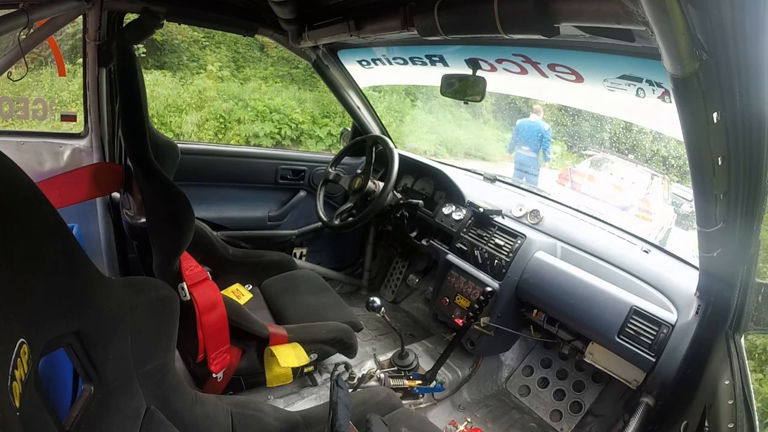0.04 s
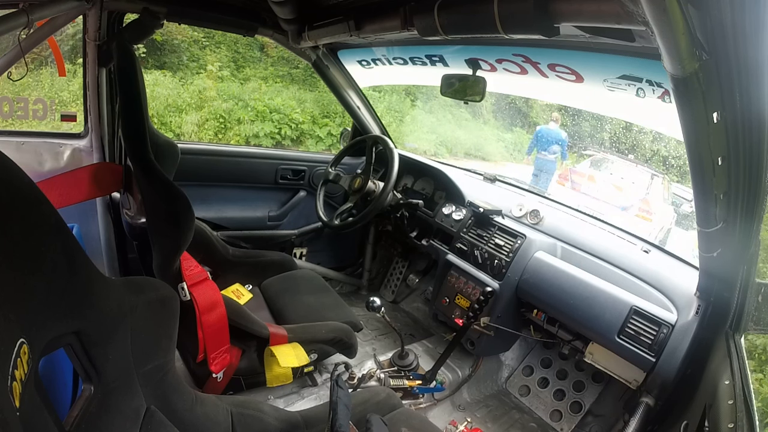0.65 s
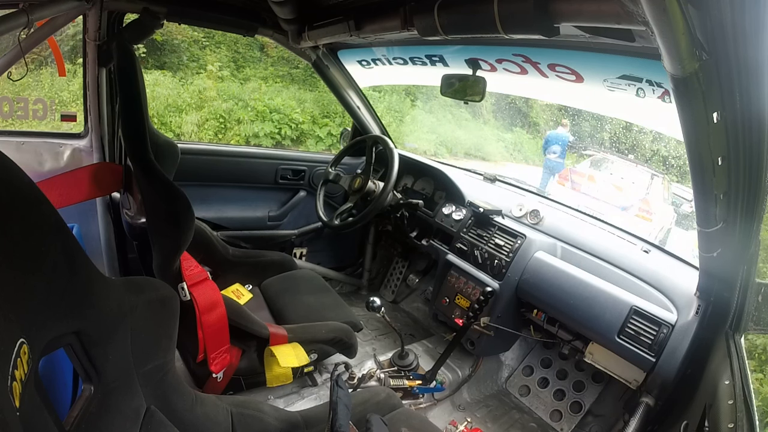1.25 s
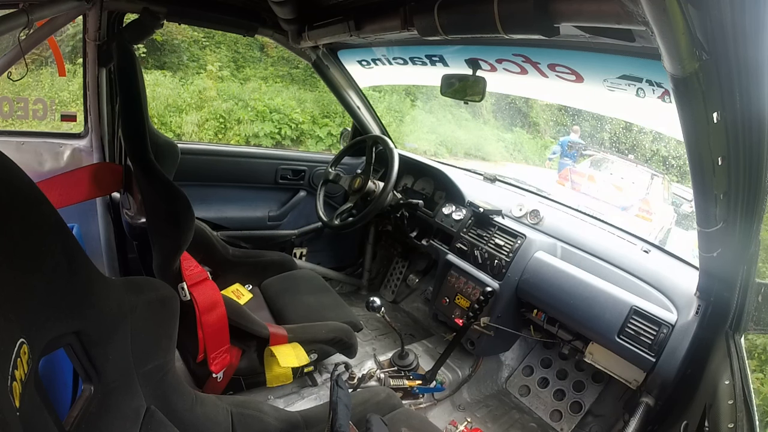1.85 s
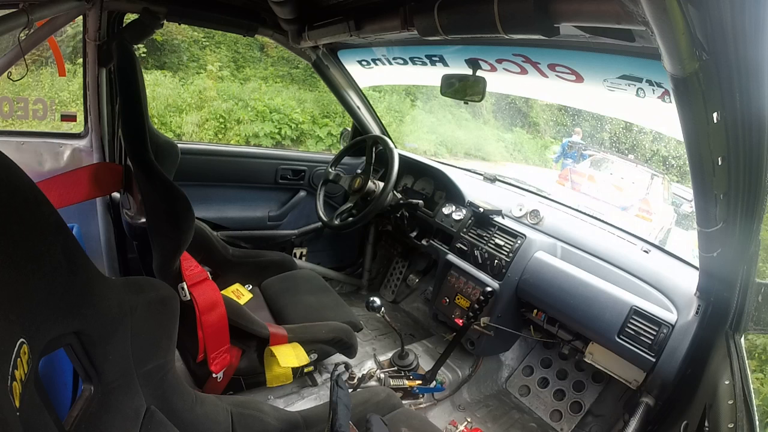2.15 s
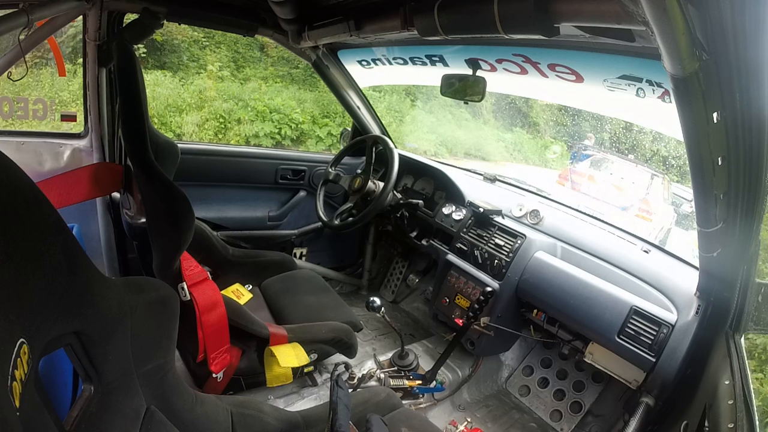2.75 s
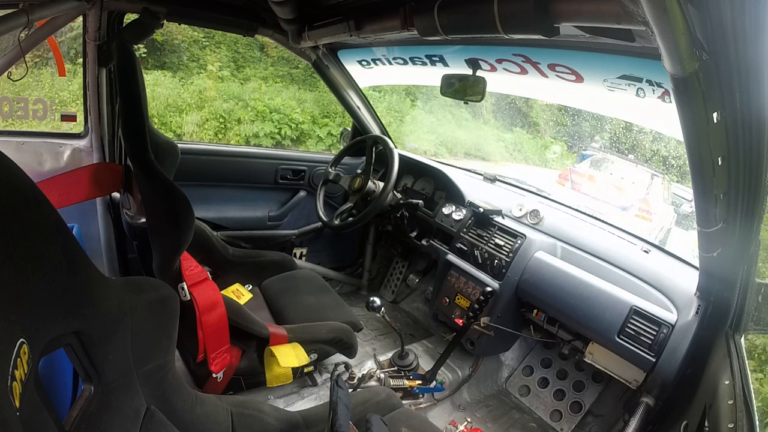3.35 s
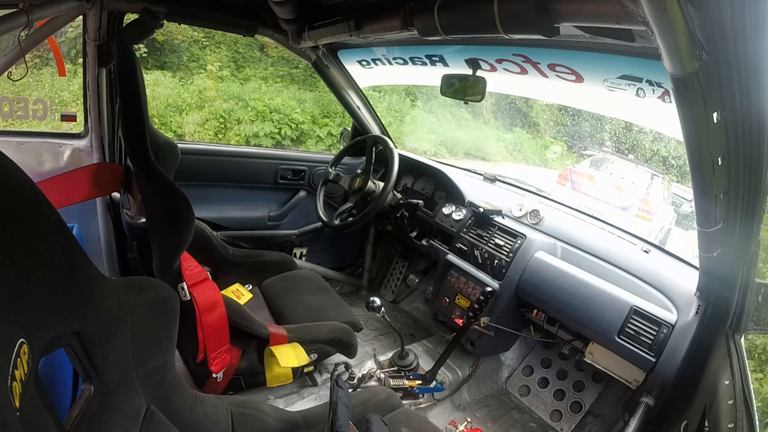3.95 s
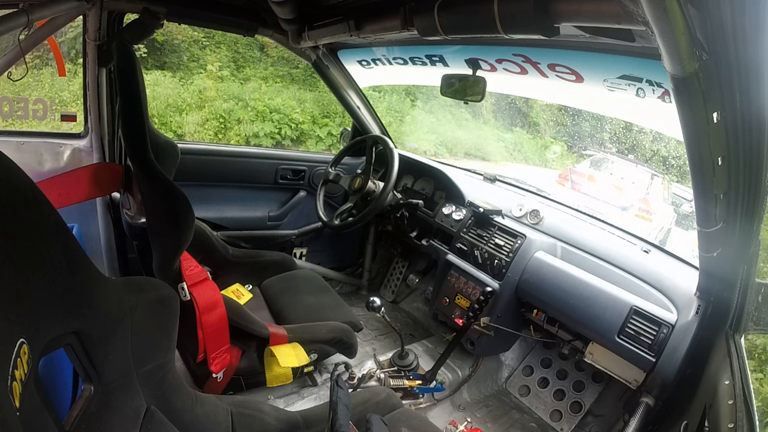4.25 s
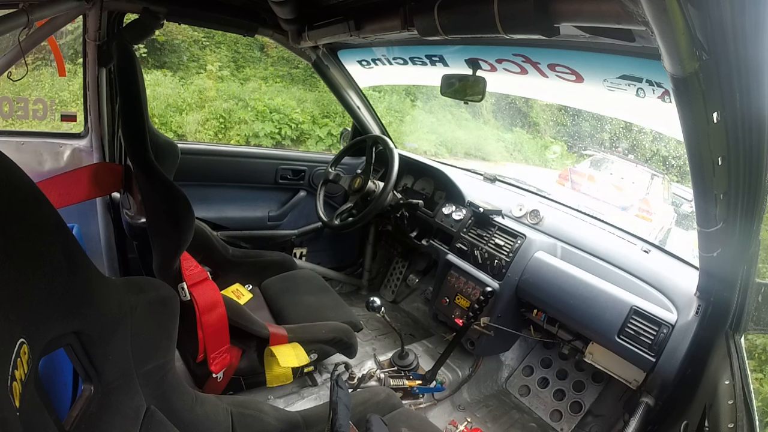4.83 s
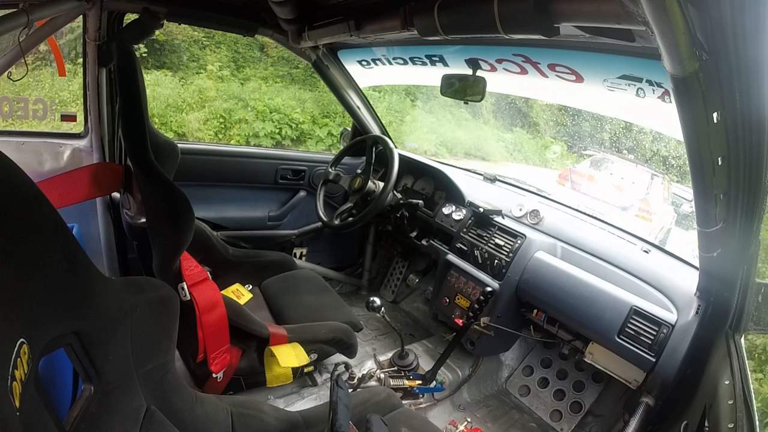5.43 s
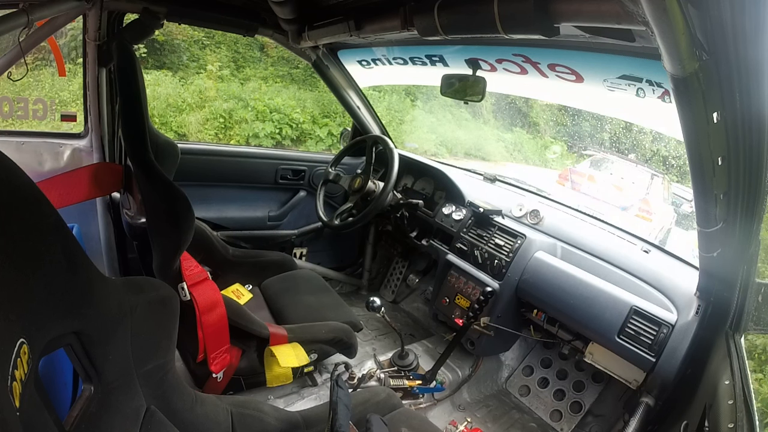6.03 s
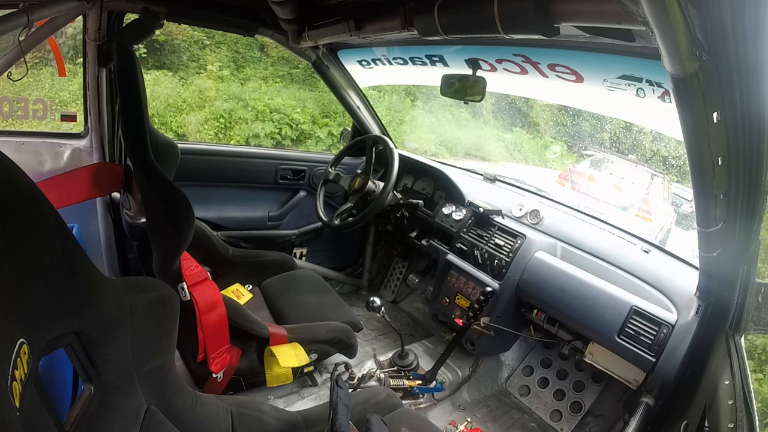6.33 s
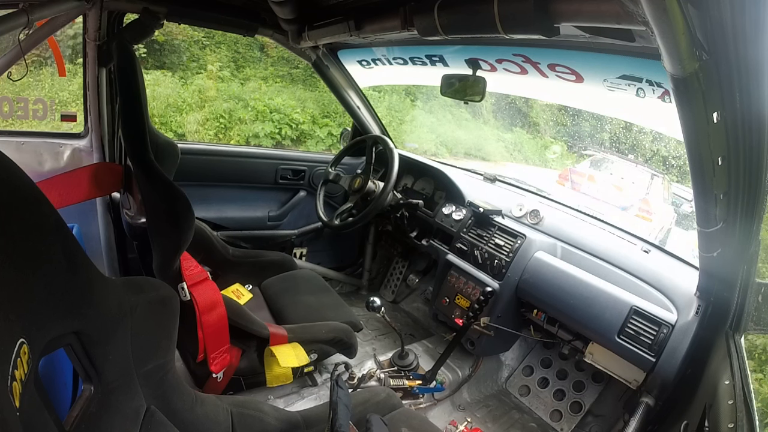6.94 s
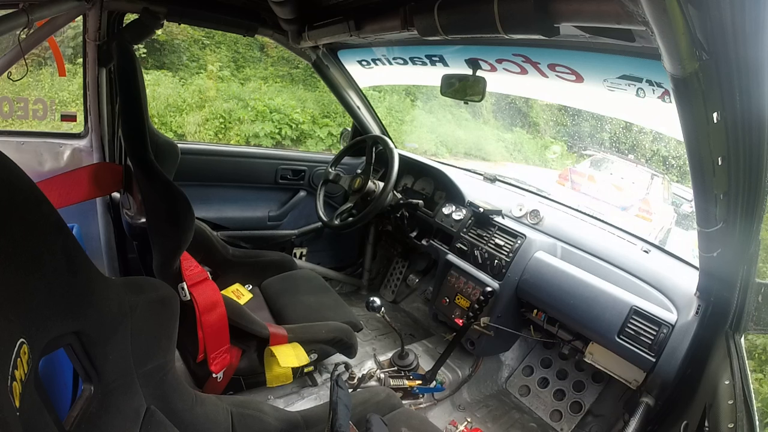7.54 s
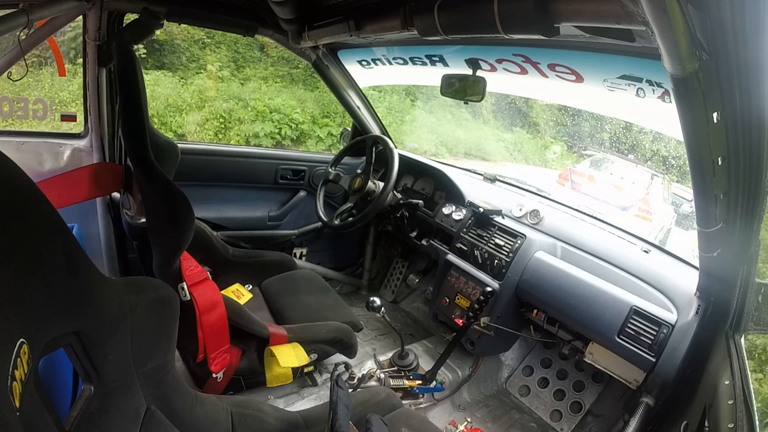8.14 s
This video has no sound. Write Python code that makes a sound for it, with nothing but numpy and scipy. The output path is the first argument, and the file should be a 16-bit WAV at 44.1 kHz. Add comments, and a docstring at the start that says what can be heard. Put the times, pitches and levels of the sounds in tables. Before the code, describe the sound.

A deep, lumpy engine idle rises and falls throughout, heard from between the seats of a stationary rally car with a bare, booming cabin. Ragged at first, it soon settles into regular surges. The low drone of another car ahead gradually climbs in pitch and grows stronger in the second half. Soft engine hiss, a thin pump whine and scattered small ticks stay far in the background.

```python
"""Idling inside a rally car

In a stripped, parked car a four-cylinder engine hunts up and down at a lumpy idle, and its firing
harmonics drive the resonances of the bare cabin into a boom. A second car waiting ahead slowly raises
its revs. Beneath them are engine hiss, a faint pump whine, ticks of loose fittings and an insect."""
import sys
import numpy as np
from scipy import signal
from scipy.fft import rfft, irfft, next_fast_len
from scipy.io import wavfile
from scipy.ndimage import map_coordinates

SR = 44100
rng = np.random.default_rng(int(sys.argv[2]) if len(sys.argv) > 2 else 0)


def unload_audio(sound):
    """Save the sound as a 16-bit wav file, at the path given as the first command line argument."""
    columns = np.transpose(np.atleast_2d(sound))
    # keep every value between -1 and 1, then stretch to whole-number steps
    steps = np.round(np.clip(columns, -1, 1) * 32767)
    wavfile.write(sys.argv[1], SR, steps.astype(np.int16))


N = 360909


# exhaust harmonics: multiple of the firing rate, relative level/dB, share of the surge, flutter/dB
EXHAUST_HARMONICS = [(1, -0.5, -0.7, 2), (2, -1, 1, 1.5), (3, 1, 1.12, 1), (4, -4, 0.35, 4),
                     (5, -5, 1.3, 2.5), (6, -8, 1.2, 2.5), (7, -12, .4, 3.5), (8, -13, .6, 3)]
# the firing, ragged at first, steadies: t/s, even note gain/dB, uneven burns gain/dB
FIRING_BALANCE = [(0, -5, -6), (.6, -5, -6), (.95, -.5, -5.5), (1.6, -1, -9), (8.18, -1, -9.5)]

def idle(firings, gain_db=-24.5, split_hz=190, boom_share=0.73, rasp_db=-1.5):
    """Forced resonance: exhaust harmonics and uneven burns drive the cabin; surges make them bark."""
    *_, swells_db, barks_db, holds_s = np.transpose(SURGES)
    swell_db = surge_gain(swells_db, np.zeros_like(holds_s), lead_s=.13, attack_s=.22, release_s=.16)
    bark_db = surge_gain(barks_db, holds_s, lead_s=.045, attack_s=.12, release_s=.09)
    exhaust = np.zeros(N)
    for k, db, share, flutter_db in EXHAUST_HARMONICS:
        surge_db = share * (bark_db if k > 3 else swell_db)
        exhaust += amp(db + surge_db + flutter_db * wobble(32)) * np.sin(2 * np.pi * k * firings)
    pulses = uneven_burns(firings)
    low = lambda hz: 1 / (1 + (hz / split_hz) ** 16)
    upper_band = lambda hz: np.sqrt(1 - low(hz)) / (1 + (hz / (2 * split_hz)) ** 4)
    boom = filtered(pulses, lambda hz: cabin_gain(hz) * np.sqrt(low(hz)))
    rasp = filtered(pulses, lambda hz: cabin_gain(hz) * upper_band(hz))
    uneven = (amp(boom_share * swell_db) * boom + amp(rasp_db + bark_db) * rasp) / boom.std()
    note_db, uneven_db = curves(FIRING_BALANCE)
    return amp(gain_db) * (amp(note_db) * filtered(exhaust, cabin_gain) + amp(uneven_db) * uneven)


def uneven_burns(firings, limp=0.31):
    """Cyclic variation: each firing is an impulse sized by its departure from the average burn."""
    at = np.flatnonzero(np.diff(np.floor(firings)) > 0)
    alternation = limp * (-1) ** np.arange(len(at))  # every other burn is a little weak
    return np.bincount(at, rng.uniform(-2.16, 2.06, len(at)) + alternation, N)


# the engine sags, catches and surges: catch t/s, speed there/rpm, climb/s, top speed/rpm,
# boom swell/dB, bark/dB, bark hold past the top/s
SURGES = [(-.188, 1245, 0.3645, 1361, 4.5, 7, 0.11), (.494, 1136, .15, 1313, 2.5, 4.5, .05),
          (.928, 1125, 0.4722, 1401, 4, 6, 0.087), (1.859, 1078, 0.331, 1505, 6.5, 6, .12),
          (2.811, 1051, .261, 1513, 5, 8, .1), (3.649, 1096, 0.251, 1433, 7.5, 6, .08),
          (4.418, 1053, .25, 1471, 4, 8, 0.051), (5.1, 1052, .34, 1397, 2, 5.5, -.05),
          (5.705, 1019, 0.283, 1372, 3.5, 6, .14), (6.555, 1072, 0.2197, 1501, 3.5, 9.5, .06),
          (7.255, 1070, .4, 1442, 3.5, 8, 0.0069), (8.103, 1083, .29, 1401, 4.5, 6, .05)]

def hunting(ease=0.61):
    """Hunting oscillation: the speed in rpm climbs from each catch to its top, then sinks to the next."""
    turns = []
    for s, low_rpm, climb_s, top_rpm, *_ in SURGES:
        turns += [(s, low_rpm), (s + climb_s, top_rpm)]
    s, rpm = np.transpose(turns)
    step = np.interp(np.arange(N) / SR, s, np.arange(len(s)))
    eased = np.floor(step) + (1 - np.cos(np.pi * (step % 1))) / 2
    return np.interp(ease * eased + (1 - ease) * step, np.arange(len(s)), rpm)


def surge_gain(peaks_db, holds_s, lead_s, attack_s, release_s):
    """Amplitude envelope in dB: it rises from just before each catch and falls near the top speed."""
    t = np.arange(N) / SR
    gain_db = np.zeros(N)
    for (s, _, climb_s, *_), db, hold_s in zip(SURGES, peaks_db, holds_s):
        rise = (t - s + lead_s) / attack_s
        fall = 1 - (t - s - climb_s - hold_s) / release_s
        gain_db = np.maximum(gain_db, db * np.clip(np.minimum(rise, fall), 0, 1))
    return gain_db


# response of the bare cabin: f/Hz, gain/dB
CABIN_RESPONSE = [(22, -37.5), (35, -32), (45, -17), (56, -23.5), (67, -15.5), (74, -9), (81, -3),
                  (93, -6.5), (104, -4.5), (113, 1), (122, -5.5), (137, -13), (149, -25), (164, -17),
                  (184, -24), (198, -28.5), (224, -16), (244, -22), (262, -50), (303, -42.5), (323, -28.5),
                  (345, -45.5), (600, -59.5)]

def cabin_gain(hz):
    """Transfer function: air and panel modes favour some low frequencies over others."""
    f, db = np.transpose(CABIN_RESPONSE)
    return amp(np.interp(hz, f, db))


# fundamental of the car ahead: t/s, speed/rpm, level/dB
AHEAD_DRONE = [(0, 2475, -36), (.23, 2408, -33), (.64, 2384, -34), (.92, 2442, -30), (1.24, 2491, -26.5),
               (1.83, 2537, -28.5), (2.28, 2669, -27.5), (2.66, 2746, -31), (2.97, 2787, -36),
               (3.21, 2840, -24), (3.69, 2913, -35.5), (4.52, 3107, -30.5), (5.28, 3304, -23.5),
               (5.97, 3151, -23.5), (6.61, 3224, -20), (6.66, 3168, -26.5), (7.25, 3248, -27),
               (7.52, 3290, -24), (8.15, 3332, -35)]
# its overtones: t/s, level/dB at 2, 3 and 4 times the firing rate
AHEAD_OVERTONES = [(0, -40, -57, -61), (.6, -42.5, -64, -58.5), (1.3, -45, -69.5, -69),
                   (2.2, -47.5, -72, -74.5), (2.7, -61.5, -77, -74.5), (4, -60.5, -70.5, -76),
                   (4.6, -53.5, -68.5, -74), (6.7, -50.5, -68, -74.5), (7.3, -56, -56, -74),
                   (8.18, -51.5, -61, -74)]

def car_ahead(flutter_db=1.4):
    """Harmonic series on a second engine's firing rate; it beats against the idle's gliding harmonics."""
    rpm, drone_db = curves(AHEAD_DRONE)
    phase = 2 * np.pi * firing_count(rpm)
    overtones = sum(amp(db + flutter_db * wobble(12)) * np.sin(k * phase)
                    for k, db in enumerate(curves(AHEAD_OVERTONES), 2))
    return np.sqrt(2) * (amp(drone_db) * np.sin(phase) + overtones)


# mechanical noise through the bulkhead: f/Hz, relative spectral level/dB
RUSH_SPECTRUM = [(190, -30), (330, -1), (357, -2), (492, -6.5), (635, -9), (978, -14.5), (1260, -16.5),
                 (1500, -17), (1660, -18.5), (1880, -17.5), (2170, -17.5), (3140, -23), (6230, -30),
                 (12200, -40), (15000, -48)]
# resonances of thin panels: f/Hz, width/Hz, gain/dB
PANEL_MODES = [(647, 80, -2.5), (1270, 120, 2), (1680, 120, -0.5), (2230, 380, -8), (6240, 350, -2.5)]
# course of the noise: t/s, low band gain/dB, high band gain/dB
RUSH_GAINS = [(0, -52.5, -64), (.75, -60, -65), (2.7, -60.5, -65.5), (5.5, -60, -65), (8.18, -58.5, -65)]

def engine_rush(firings, rpm, split_hz=950, floor_hz=250):
    """Modulated noise: valve gear, belts and intake hiss, pulsing with the firings, rising with speed."""
    low_db, high_db = curves(RUSH_GAINS)
    f, db = np.transpose(RUSH_SPECTRUM[1:-1])
    panels = lambda hz: np.hypot(1, .9 * resonances(PANEL_MODES, hz))
    colour = lambda hz: amp(np.interp(np.log(hz + 1), np.log(f), db)) * panels(hz)
    low = lambda hz: 1 / (1 + (hz / split_hz) ** 4)
    body = noise(lambda hz: colour(hz) * np.sqrt(low(hz)) * hz / np.hypot(hz, floor_hz))
    hiss = noise(lambda hz: colour(hz) * np.sqrt(1 - low(hz)))
    pulsing = 0.66 * np.cos(2 * np.pi * firings) + 0.32 * np.cos(np.pi * firings)
    drive = pulsing + 4.3 * np.log(rpm / rpm.mean())
    body *= amp(low_db + 3.5 + 1.7 * drive + 0.79 * wobble(12))
    hiss *= amp(high_db + 6 + 0.5 * drive + 0.28 * wobble(22))
    return body + hiss


# whine of the fuel pump: t/s, f/Hz, level/dB
PUMP_WHINE = [(0, 2194, -76), (.7, 2145, -67), (1.5, 2132, -68), (2.15, 2137, -70), (2.35, 2147, -62.5),
              (2.7, 2127, -76.5), (3.15, 2130, -69), (4.5, 2098, -73.5), (8.18, 2080, -84.5)]

def fuel_pump():
    """Random amplitude and frequency modulation make a thin tone flutter."""
    hz, db = curves(PUMP_WHINE)
    flutter = unit(amp(2 * wobble(14) + 2.5 * wobble(60)))
    waver_hz = 6 * wobble(16) + 16 * wobble(200)
    return amp(db) * flutter * np.sin(2 * np.pi * np.cumsum(hz + waver_hz) / SR)


# taps of loose fittings: t/s, relative peak level/dB, favoured f/Hz, brightness/dB
TAPS = [(1.412, -41.5, 1237, -3), (1.491, -48.5, 1920, -6), (2.8735, -49, 1370, -13),
        (3.1698, -49.5, 1395, -13), (3.22, -52, 1230, -9), (3.6371, -44.5, 1220, -4),
        (3.9024, -44, 1392, -15), (3.9362, -47.5, 1250, -17), (4.104, -51, 1645, -10),
        (4.327, -51, 1509, -12), (4.9912, -53, 1593, -10), (5.4512, -38, 1690, -7.5),
        (5.9722, -48.5, 2656, -11), (6.9175, -45, 1900, -13), (7.1799, -55, 1311, -11),
        (7.325, -49, 1686, -17)]
# modes of the fittings: f/Hz, relative level/dB, T60/s
FITTING_MODES = [(1230, -4, .022), (1390, -7.5, 0.023), (1683, -5, .038), (1853, -5, .02), (2100, -4, .022),
                 (2590, -4, 0.017), (2700, -6.5, 0.015)]

def loose_fittings(bright_hz=2350, focus_db=10, spread=0.082, scuff_t60=0.022, scuff_hz=(1050, 3050)):
    """Impacts scuff and excite damped modes; the place of contact favours those near one frequency."""
    out, t = np.zeros(N), np.arange(SR // 8) / SR
    band = signal.butter(4, scuff_hz, "bandpass", fs=SR, output="sos")
    attack = 1 - np.exp(-t / .001)
    for s, db, main_hz, bright_db in TAPS:
        ring = np.zeros(len(t))
        for hz, mode_db, t60 in FITTING_MODES:
            contact_db = focus_db * np.exp(-(np.log(hz / main_hz) / spread) ** 2)
            treble_db = (hz > bright_hz) * (bright_db + 10)
            decay = amp(mode_db + rng.normal(0, 1) + contact_db + treble_db - 60 * t / t60)
            ring += decay * np.sin(2 * np.pi * (hz * rng.normal(1, 0.0071) * t + rng.random()))
        scuff = signal.sosfilt(band, rng.standard_normal(len(t)) * amp(-60 * t / scuff_t60))
        tap = (unit(ring) + amp(bright_db + 1) * unit(scuff)) * attack
        add(out, s, amp(db + 3) * tap / np.abs(tap).max())
    return out


# chirps from the verge: t/s, relative level/dB
INSECT_CHIRPS = [(0.507, -82), (1.829, -78), (3.0513, -78), (4.2934, -79), (5.4494, -77.5), (7.8976, -81)]

def insect(pitch_hz=10280, width_hz=170, length_s=0.098):
    """Narrow-band noise in smooth bursts is heard as short, very high rasps."""
    envelope = np.zeros(N)
    for s, db in INSECT_CHIRPS:
        add(envelope, s, amp(db - 1) * np.hanning(int(length_s * SR)))
    return envelope * noise(lambda hz: resonances([(pitch_hz, width_hz, 0)], hz))


def firing_count(rpm):
    """Phase in cycles is the integral of the firing rate: four cylinders fire twice a turn."""
    return np.cumsum(rpm / 30) / SR


def resonances(modes, hz):
    """Gain of steep-sided resonances, summed in power."""
    return np.sqrt(sum(amp(db) ** 2 / (1 + ((hz - centre) / width * 1.3) ** 2) ** 3
                       for centre, width, db in modes))


def filtered(x, gain):
    """Minimum-phase filter: folding the cepstrum makes the response gain(hz) causal."""
    size = 2 * next_fast_len(N // 2 + SR)
    cepstrum = irfft(np.log(np.maximum(gain(np.fft.rfftfreq(size, 1 / SR)), 1e-5)))
    cepstrum[1:size // 2] *= 2
    cepstrum[size // 2 + 1:] = 0
    return irfft(rfft(x, size) * np.exp(rfft(cepstrum)))[:N]


def noise(gain):
    """Gaussian noise of rms 1, coloured by gain(hz)."""
    return unit(filtered(rng.standard_normal(N), gain))


def wobble(rate):
    """Spline interpolation of random values, rate knots a second."""
    return map_coordinates(rng.standard_normal(int(N * rate / SR) + 4), [np.arange(N) * rate / SR])


def curves(rows):
    """Linear interpolation of each column after the time, one value per sample."""
    s, *columns = np.transpose(rows)
    return [np.interp(np.arange(N) / SR, s, column) for column in columns]


def amp(db):
    """Decibels to amplitude ratio."""
    return 10 ** (np.asarray(db) / 20)


def unit(x):
    """Normalise to rms 1."""
    return x / np.sqrt(np.mean(x ** 2) + 1e-20)


def add(track, s, sound):
    """Superpose a short sound at s seconds."""
    part = track[max(round(s * SR), 0):][:len(sound)]
    part += sound[:len(part)]


def scene():
    """Superposition between the seats: one hunting speed governs both the idle and the engine's rush."""
    rpm = hunting()
    firings = firing_count(rpm)
    engines = idle(firings) + car_ahead() + engine_rush(firings, rpm)
    return (engines + fuel_pump() + loose_fittings() + insect())[None]


def record(dry, top_hz=14400):
    """Band limiting: an ideal low-pass filter removes the highest treble."""
    size = next_fast_len(N + SR)
    passband = np.fft.rfftfreq(size, 1 / SR) < top_hz
    return irfft(rfft(dry, size) * passband, size)[:, :N]


dry = scene()
out = record(dry)
unload_audio(out)
```